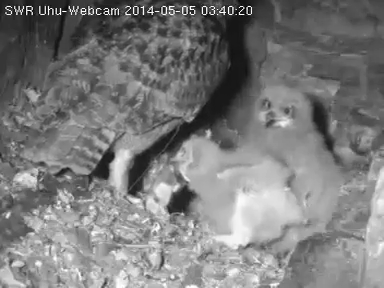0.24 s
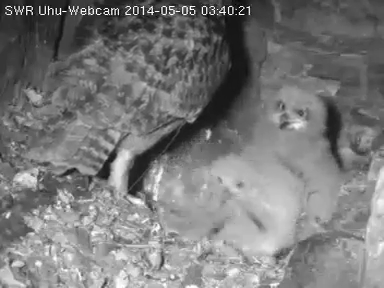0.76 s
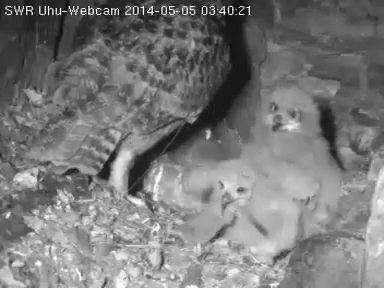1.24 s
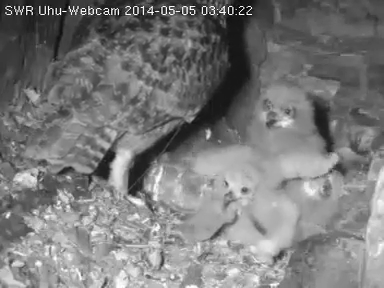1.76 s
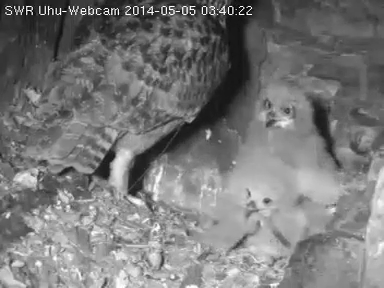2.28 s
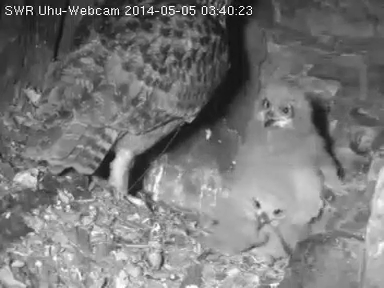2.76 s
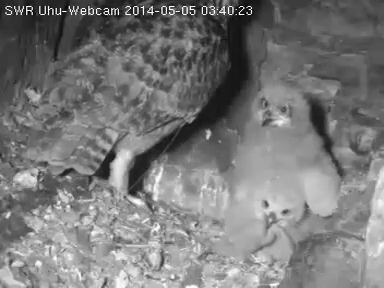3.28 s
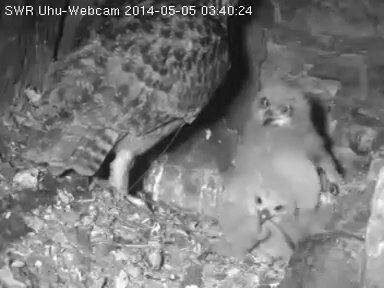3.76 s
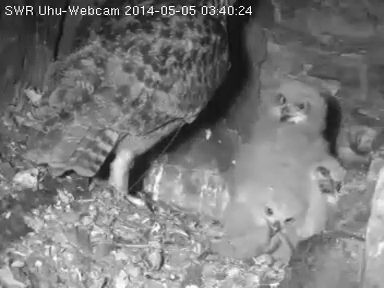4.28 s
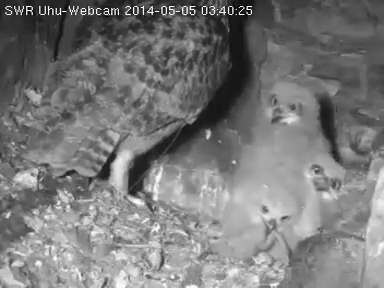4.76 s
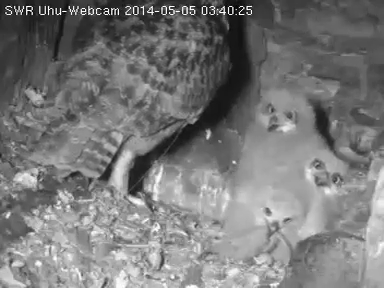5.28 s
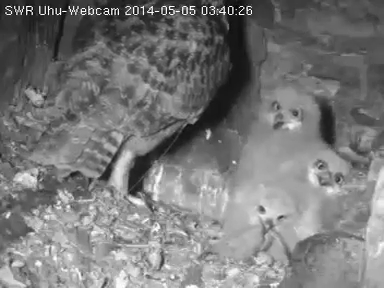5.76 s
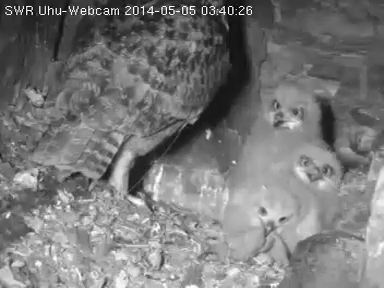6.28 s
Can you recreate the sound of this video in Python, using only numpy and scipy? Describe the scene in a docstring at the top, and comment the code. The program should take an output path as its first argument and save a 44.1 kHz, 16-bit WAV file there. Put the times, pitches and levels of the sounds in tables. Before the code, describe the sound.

A hissy begging screech, a little chitter of squeaks, then another raspy screech from owl chicks, above low hum and dull night air.

```python
"""Owl chicks begging at night

On a rocky nest ledge, two long screeches each rise as a whistle, turn into a raspy hiss and sink back
to a whistle; four squeaks chitter between them. The voices are wavering tones with one overtone, the
hiss is noise shaped by throat and beak. Decaying thumps and brushed noise are a chick shuffling in
the litter; steady tones and dull noise are mains hum, night air and microphone hiss."""
import sys
import numpy as np
from scipy import signal
from scipy.fft import rfft, irfft, next_fast_len
from scipy.io import wavfile

SR = 44100
rng = np.random.default_rng(int(sys.argv[2]) if len(sys.argv) > 2 else 0)


def unload_audio(sound):
    """Save the sound as a 16-bit wav file, at the path given as the first command line argument."""
    columns = np.transpose(np.atleast_2d(sound))
    # keep every value between -1 and 1, then stretch to whole-number steps
    steps = np.round(np.clip(columns, -1, 1) * 32767)
    wavfile.write(sys.argv[1], SR, steps.astype(np.int16))


N = 288061
TIME = np.arange(N) / SR  # seconds
BINS = np.maximum(np.arange(N // 2 + 1) * SR / N, 1)  # frequencies in Hz, kept above zero

# The long begging calls. Each row: start in seconds, length in seconds, pitch in Hz, swell in dB,
# swell time in seconds, closing whistle in seconds, opening whistle in dB, then the levels at full
# effort of voice, throat hiss, low rasp and top hiss, all in dB.
SCREECH_CALLS = [(1.069, .348, 3005, 20, 0.23, .022, -40.5, -34.5, -28, -40.5, -43.8),
                 (4.914, .346, 2848, 15, 0.21, 0.0267, -42.5, -34, -28, -37, -43)]
HISS_DELAY_S = 0.011  # the hiss sets in after the voice


def from_db(db):
    """Turn decibels into gain."""
    return 10 ** (np.asarray(db) / 20)


def rms_one(x):
    """Scale to unit power."""
    return x / np.sqrt(np.mean(x ** 2) + 1e-20)


def since(s):
    """Seconds since a moment, zero before it."""
    return np.maximum(TIME - s, 0)


def until(s):
    """Seconds left to a moment, zero after it."""
    return np.maximum(s - TIME, 0)


def sounding(start, end, attack, release):
    """Loudness that ramps up to one, holds, and ramps down to zero."""
    return np.minimum(since(start) / attack, 1) * np.minimum(until(end) / release, 1)


def noise(gain):
    """Unit-power noise, coloured by a gain for each frequency in BINS."""
    size = next_fast_len(N)
    shape = np.interp(np.arange(size // 2 + 1) * SR / size, BINS, gain)
    spectrum = rfft(rng.standard_normal(size)) * shape
    return rms_one(irfft(spectrum, size)[:N])


def flutter(rate_hz):
    """Random motion, mostly slower than the given rate, with a spread of 1."""
    return noise(1 / (1 + (BINS / rate_hz) ** 2))


def band(low_hz, high_hz, order=6):
    """Gain at each frequency of a filter that passes one band."""
    low_cut = 1 + (low_hz / BINS) ** (2 * order)
    high_cut = 1 + (BINS / high_hz) ** (2 * order)
    return 1 / np.sqrt(low_cut * high_cut)


def background():
    """Steady mains hum lies over the dull noise of night air and microphone hiss."""
    # Mains hum. Each row: frequency in Hz, rms level in dB.
    hum_tones = [(50, -74), (150, -65), (250, -81.5), (350, -80.5), (450, -77.5), (650, -82)]
    # Colour of night air and microphone hiss. Each row: frequency in Hz, relative density in dB.
    air_colour = [(25, -24), (45, -13.5), (85, -8), (125, -9), (180, -1.5), (230, -13), (390, -9.5),
                  (470, -4), (560, -12), (1050, -12), (1500, -17), (2600, -20), (3800, -24.5),
                  (7400, -25.5), (8600, -28)]
    air_db = -62.5
    hum = sum(np.sqrt(2) * from_db(db) * np.sin(2 * np.pi * (hz * TIME + rng.random()))
              for hz, db in hum_tones)
    hz, db = np.transpose(air_colour)
    colour = from_db(np.interp(np.log(BINS), np.log(hz), db))
    return hum + from_db(air_db) * noise(colour)


def shuffle():
    """Feet make the nest floor ring briefly; down brushes dry litter, which shifts dully underneath."""
    # Soft footfalls. Each row: start in seconds, level in dB.
    steps = [(0.524, -43.5), (.556, -56), (0.568, -49), (.752, -49)]
    # Ringing of the nest floor. Each row: frequency in Hz, level in dB, time to fade 60 dB in seconds.
    ground = [(168, 0.5, 0.065), (292, -5, 0.037)]
    # Brushing strokes. Each row: middle in seconds, spread in seconds, level in dB.
    rustles = [(0.75, 0.0086, -62.5), (0.808, 0.02, -62.5)]
    litter_db = -1
    out, age = np.zeros(N), np.arange(SR // 4) / SR
    landing = 1 - np.exp(-age / 0.0013)  # a padded foot lands gently
    for s, step_db in steps:
        thump = sum(from_db(step_db + db - 60 * age / t60) * np.sin(2 * np.pi * hz * age)
                    for hz, db, t60 in ground)
        first = int(s * SR)
        out[first:first + len(age)] += thump * landing
    stroke = sum(from_db(db) * np.exp(-.5 * ((TIME - s) / spread) ** 2) for s, spread, db in rustles)
    brush = noise(band(1400, 7000, order=2)) * from_db(2.2 * flutter(rate_hz=280))
    litter = from_db(litter_db) * noise(band(200, 430, order=3))
    return out + stroke * (brush + litter)


def syrinx(notes, overtone_db, jitter, jitter_hz, shimmer_db):
    """A membrane whistles with one overtone; roughness shakes its pitch and strength.

    A note is (gate, pitch in Hz, level in dB, roughness)."""
    # Where the open mouth lifts the overtone. Each row: centre in Hz, spread in Hz, lift in dB.
    mouth = [(3100, 550, 16.5), (4170, 310, 13), (6235, 200, 14.5), (8270, 400, 22)]
    out, shake, tremble = np.zeros(N), flutter(jitter_hz), np.tanh(flutter(jitter_hz))
    for note in notes:
        on = note[0] > 0
        gate, hz, level_db, rough = (control[on] for control in np.broadcast_arrays(*note))
        shaken_hz = hz * (1 + jitter * rough * shake[on])
        phase = 2 * np.pi * np.cumsum(shaken_hz) / SR
        strength = gate * from_db(level_db + shimmer_db * rough * tremble[on])
        lift_db = sum(db * np.exp(-.5 * ((2 * hz - centre) / spread) ** 2)
                      for centre, spread, db in mouth)
        overtone = from_db(overtone_db + lift_db) * np.sin(2 * phase)
        out[on] += np.sqrt(2) * strength * (np.sin(phase) + overtone)
    return out


def squeak_notes():
    """Each squeak falls, then flicks up; away from the throat's favoured pitch it is weak and strained."""
    # Each row: start in seconds, length in seconds, attack in seconds, start pitch in Hz, time held in
    # seconds, fall in octaves per second, end pitch in Hz, level in dB before the throat's gain,
    # depth in dB of the dip before the end.
    squeaks = [(3.653, 0.043, 0.0025, 2990, 0.0078, 8.7, 4360, -35.5, 1.5),
               (3.777, .042, .005, 3430, 0.0029, 33, 4400, -40.5, 18),
               (3.896, .05, 0.0046, 3510, 0.0019, 30, 4380, -37.5, 28),
               (4.016, 0.022, 0.0043, 3410, 0, 42, 2450, -38.5, 3.5)]
    # How the throat favours some pitches. Each row: pitch in Hz, gain in dB.
    throat_gain = [(2200, -22), (2450, -11), (2680, -2.5), (3000, -2.5), (3280, 2.5), (3600, -4.5),
                   (4300, -4.5)]
    flick_s, flick_bend = .028, 0.54  # the last octave of the flick takes flick_s
    break_lead_s, break_s = .017, 0.0047  # the voice weakens just before the end
    edge_s, clean_rough, strain_rough = 0.00088, 0.016, 0.1
    for s, length, attack, start_hz, held, fall, end_hz, level_db, break_db in squeaks:
        left = until(s + length)
        falling_hz = start_hz * 2 ** (-fall * since(s + held))
        flick_hz = end_hz * 2 ** -(left / flick_s) ** flick_bend
        hz = np.maximum(falling_hz, flick_hz)
        throat_db = np.interp(hz, *np.transpose(throat_gain))
        broken = np.exp(-np.square(((left - break_lead_s) / break_s) ** 2))
        rough = clean_rough + strain_rough * np.maximum(1 - from_db(throat_db), 0)
        gate = sounding(s, s + length, attack, edge_s)
        yield gate, hz, level_db + throat_db - break_db * broken, rough


def creak(s, length, pitch_hz, level_db, beat_hz, beat, swing, wander):
    """A second membrane tugs at the first, so strength and phase flutter fast while the pitch sags."""
    # Parts of the tone, whose cycles are alternately strong and weak.
    # Each row: multiple of the pitch, level in dB.
    partials = [(.5, -20), (1, -1.5), (2, -10), (3, -25)]
    sag, bend, attack_s, release_s = 0.25, 2.77, 0.0033, 0.018  # sag is a share of the pitch
    hz = pitch_hz * (1 - sag * np.minimum(since(s) / length, 1) ** bend)
    beating = 2 * np.pi * beat_hz * TIME + flutter(rate_hz=60)
    steady_phase = 2 * np.pi * np.cumsum(hz) / SR
    phase = steady_phase + swing * np.sin(beating) + wander * flutter(rate_hz=150)
    tone = sum(from_db(db) * np.sin(k * phase) for k, db in partials)
    gate = sounding(s, s + length, attack_s, release_s)
    return np.sqrt(2) * gate * from_db(level_db) * (1 + beat * np.cos(beating)) * tone


def chitter():
    """The membrane gives clean U-shaped squeaks; the last two drop into a creaky low register."""
    # Creaks. Each row: start in seconds, length in seconds, pitch in Hz before the sag, level in dB.
    creaks = [(3.918, 0.013, 1800, -42), (4.031, .046, 1927, -43.5)]
    squeaks = syrinx(squeak_notes(), overtone_db=-25.0, jitter=0.18, jitter_hz=900, shimmer_db=13)
    return squeaks + sum(creak(*row, beat_hz=744, beat=0.1, swing=0.13, wander=1.0) for row in creaks)


def effort_db(start, swell_db, swell_s):
    """How hard a chick pushes, in dB below its hardest: the effort swells, holds and eases off."""
    hold_s, ease_db_per_s = 0.048, 129
    swell = -swell_db * np.minimum(until(start + swell_s) / swell_s, 1)
    ease = ease_db_per_s * np.minimum(since(start + swell_s + hold_s), 1)
    return swell - ease


def screech_notes():
    """The voice scoops up, turns ragged under effort, then clears and sags."""
    scoop_from_hz, scoop_s, scoop_bend = 1600, .03, 1.7
    sag_hz, sag_s = 602, .022
    clear_start_s, clear_end_s, clear_end_db = 0.018, 0.034, 11
    clear_rough, ragged_rough, attack_s, release_s = .3, 0.747, 0.011, 0.021
    for s, length, pitch_hz, swell_db, swell_s, _, opening_db, voice_db, *_ in SCREECH_CALLS:
        age, left = since(s), until(s + length)
        scoop = (pitch_hz - scoop_from_hz) * np.exp(-(age / scoop_s) ** scoop_bend)
        hz = pitch_hz - scoop - sag_hz * np.exp(-left / sag_s)
        opening = np.exp(-(age / clear_start_s) ** 2)
        closing = np.exp(-(left / clear_end_s) ** 2)
        pushed_db = voice_db + effort_db(s, swell_db, swell_s)
        level_db = opening_db * opening + pushed_db * (1 - opening) + clear_end_db * closing
        rough = ragged_rough + (clear_rough - ragged_rough) * (opening + closing)
        yield sounding(s, s + length, attack_s, release_s), hz, level_db, rough


def tail_notes():
    """As the push gives out, a low whistle falls and fades."""
    start_hz, fall_hz, level_db, fade_db, rough = 1673, 498, -33.5, 16.5, 0.49
    lead_s, attack_s, release_s = .003, 0.0094, 0.0047
    for s, length, _, _, _, tail_s, *_ in SCREECH_CALLS:
        drop = s + length
        gate = sounding(drop - lead_s, drop + tail_s, attack_s, release_s)
        fallen = since(drop) / tail_s
        yield gate, start_hz - fall_hz * fallen, level_db - fade_db * fallen, rough


def screech_hiss(leak_db):
    """Rushing air rings in the throat; each register takes its own share of the effort."""
    # Resonances of throat and nest hollow, one list for each screech.
    # Each row: frequency in Hz, width in Hz, relative level in dB.
    throat_modes = [
        [(466, 190, -15.5), (769, 65.4, -11.5), (960, 61.7, -15), (1265, 170, -16), (1656, 190, -12),
         (1810, 220, -11), (2320, 170, -9), (2853, 248, 3), (3340, 510, -1), (4280, 460, -8.5),
         (5970, 396, -16), (6830, 450, -17.5), (7230, 280, -19.5)],
        [(440, 205, -18.5), (777, 93, -10.5), (944, 49, -8.5), (1135, 87, -14), (1280, 100, -10),
         (1620, 170, -7.5), (1810, 250, -9), (2570, 44, -11), (2798, 230, -2), (3285, 290, -4), (3690, 87, -10),
         (4070, 310, -9.5), (6560, 670, -23), (7080, 280, -25)],
    ]
    # Throat hiss, low rasp and top hiss.
    # Each row: share of the effort's swing, attack in seconds, release in seconds.
    register_rows = [(1, 0.0059, 0.025), (0.37, 0.022, 0.025), (0.8, 0.0082, 0.035)]
    overhang_s = .007  # the hiss outlasts the voice slightly
    out = np.zeros(N)
    for (s, length, _, swell_db, swell_s, _, _, _, *levels_db), modes in zip(SCREECH_CALLS, throat_modes):
        power = sum(from_db(db) ** 2 / (1 + ((BINS - hz) / width) ** 2 * 2) ** 2
                    for hz, width, db in modes)
        throat = np.sqrt(power + from_db(leak_db) ** 2)  # the leak is air that does not ring
        parts = [noise(throat * band(2460, 4400, order=12)),
                 noise(throat * band(230, 9000, order=3) * band(20, 2140, order=12)),
                 noise(throat * band(4530, 7960, order=16))]
        push_db = effort_db(s, swell_db, swell_s)
        for part, db, (share, attack, release) in zip(parts, levels_db, register_rows):
            gate = sounding(s + HISS_DELAY_S, s + length + overhang_s, attack, release)
            out += gate * from_db(db + share * push_db) * part
    return out


def beak_hiss(half_width_hz):
    """Narrow bands of hiss follow the resonances of the opening beak."""
    # Gliding upper resonances, one list for each screech. Each row: frequency with the beak shut in Hz,
    # open in Hz, glide in seconds, level in dB, share of the effort's swing, attack in seconds.
    beak = [
        [(2134, 4300, .03, -50, -0.19, .006), (5460, 4850, 0.15, -39, 0.57, 0.12),
         (6550, 5380, .12, -44.5, .8, 0.12)],
        [(2650, 5020, .066, -39, 0.88, .012), (4000, 5550, .075, -43.5, 0.55, 0.0056)],
    ]
    release_s = 0.07
    out, narrow = np.zeros(N), band(0.87, half_width_hz, order=3)
    for (s, length, _, swell_db, swell_s, *_), resonances in zip(SCREECH_CALLS, beak):
        push_db = effort_db(s, swell_db, swell_s)
        for shut_hz, open_hz, glide_s, db, share, attack in resonances:
            gate = sounding(s + HISS_DELAY_S, s + length, attack, release_s)
            hz = open_hz + (shut_hz - open_hz) * np.exp(-since(s) / glide_s)
            phase = 2 * np.pi * np.cumsum(hz) / SR
            # slow noise on a moving tone makes a moving band of noise
            ringing = noise(narrow) * np.cos(phase) + noise(narrow) * np.sin(phase)
            out += gate * from_db(db + share * push_db) * ringing
    return out


def screeches():
    """The two long begging calls: a ragged whistle inside a hiss that the membranes chop unevenly."""
    voice = syrinx(screech_notes(), overtone_db=-27.5, jitter=0.0984, jitter_hz=595, shimmer_db=6)
    ending = syrinx(tail_notes(), overtone_db=-20, jitter=.05, jitter_hz=500, shimmer_db=6)
    hiss = screech_hiss(leak_db=-26.0) + beak_hiss(half_width_hz=200)
    rasp_db = 0.5
    chopping = from_db(rasp_db * np.tanh(flutter(rate_hz=540)))
    return voice + ending + hiss * chopping


def ledge(x, wet_db, t60, low_hz):
    """The rock walls scatter a short, bright tail of echoes."""
    age = np.arange(SR // 5) / SR
    tail = rng.standard_normal(len(age)) * from_db(-60 * age / t60) * (age > .002)
    tail = tail / np.linalg.norm(tail)  # so wet_db is the level before the low end is removed
    tail = signal.sosfilt(signal.butter(2, low_hz, "high", fs=SR, output="sos"), tail)
    return x + from_db(wet_db) * signal.fftconvolve(x, tail)[:N]


def scene():
    """The calls echo off the ledge, over the shuffling and the background."""
    calls = ledge(screeches() + chitter(), wet_db=-8, t60=0.074, low_hz=3120)
    return (calls + shuffle() + background())[None]


def record(dry):
    """The treble rolls off above about 7.5 kHz, and almost nothing is left above 8.7 kHz."""
    dull = signal.sosfilt(signal.butter(12, 7550, fs=SR, output="sos"), dry)
    cutoff_hz = 8700
    return signal.sosfilt(signal.ellip(10, .2, 80, cutoff_hz, fs=SR, output="sos"), dull)


dry = scene()
out = record(dry)
unload_audio(out)
```